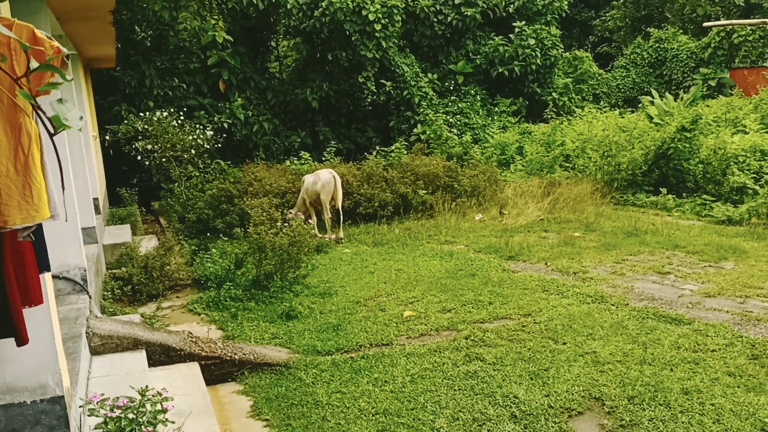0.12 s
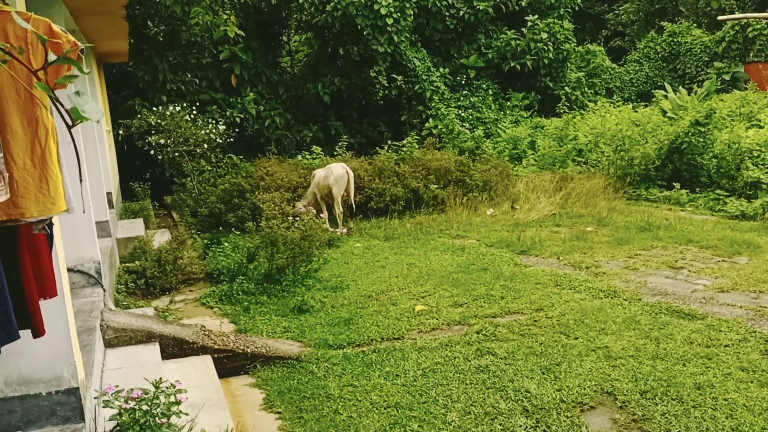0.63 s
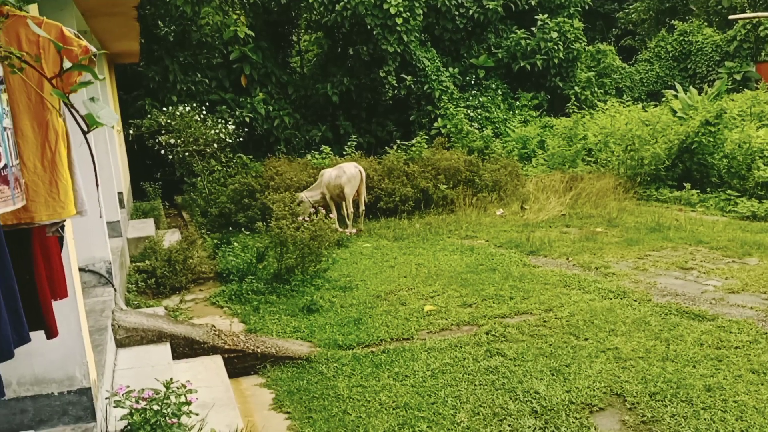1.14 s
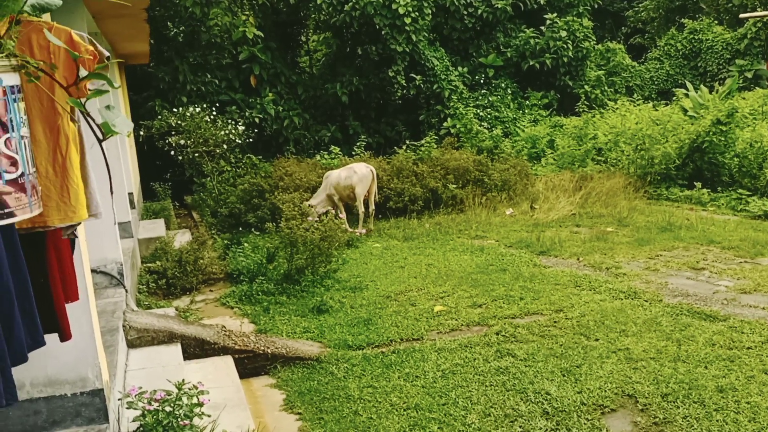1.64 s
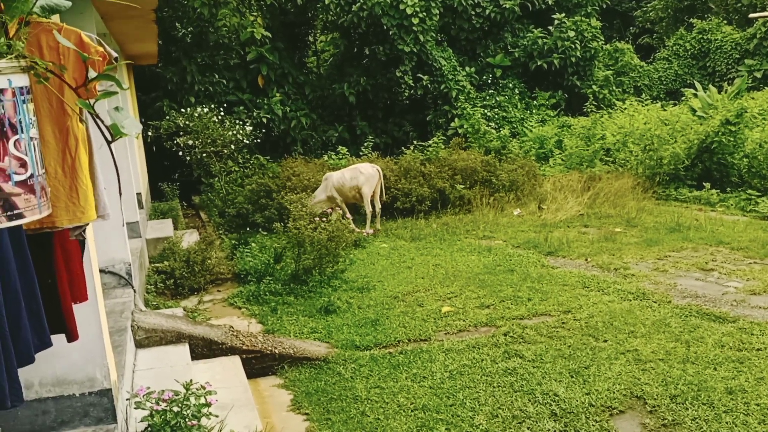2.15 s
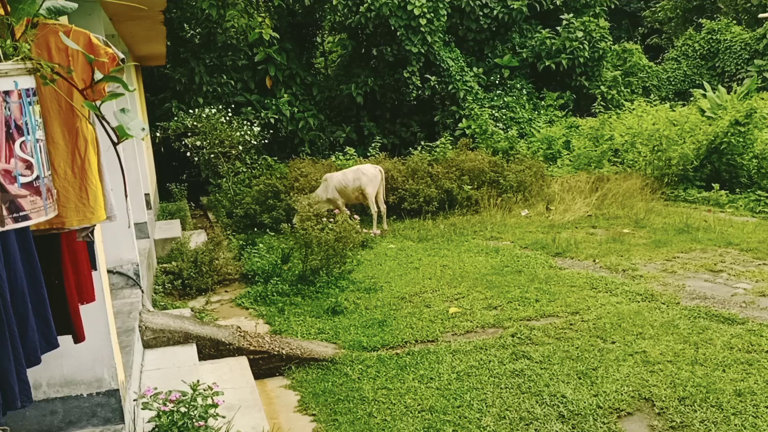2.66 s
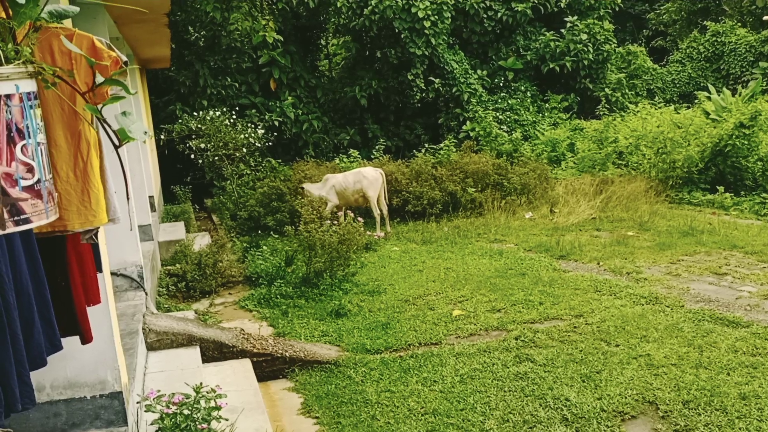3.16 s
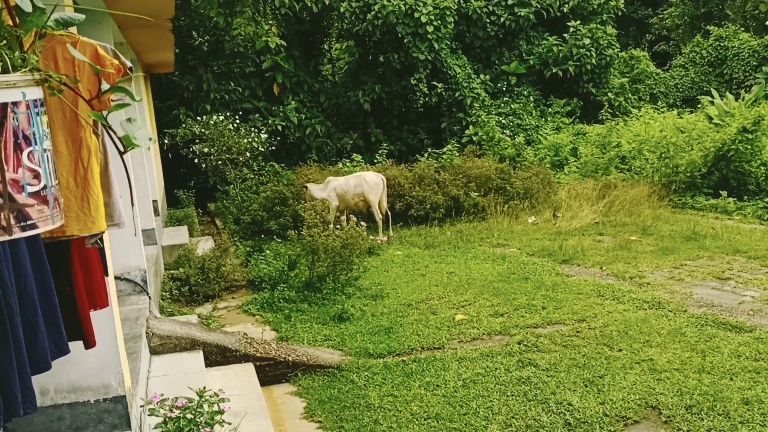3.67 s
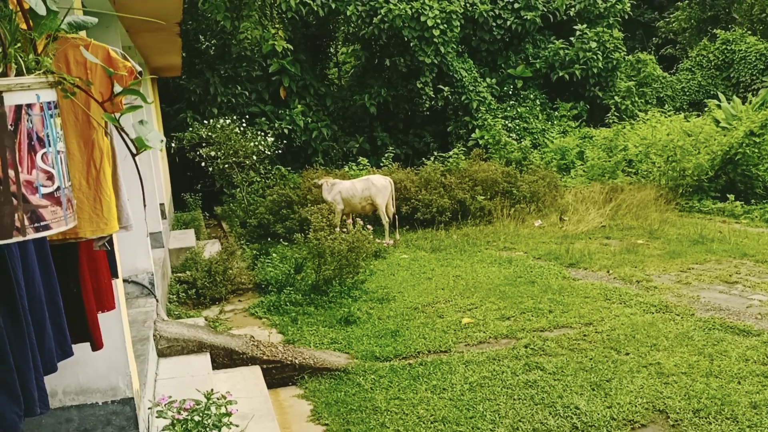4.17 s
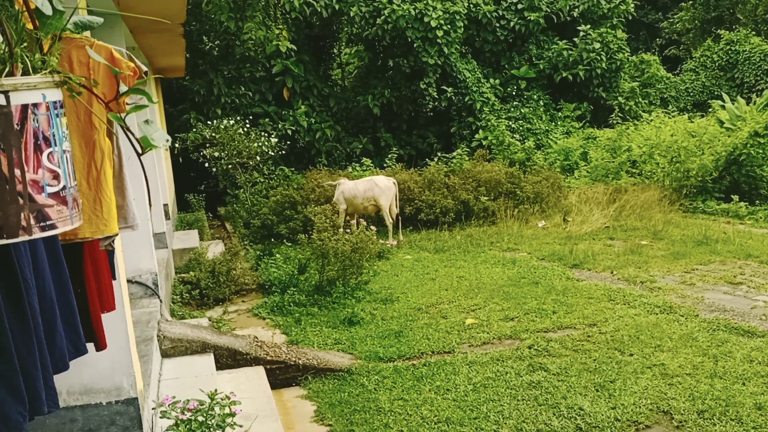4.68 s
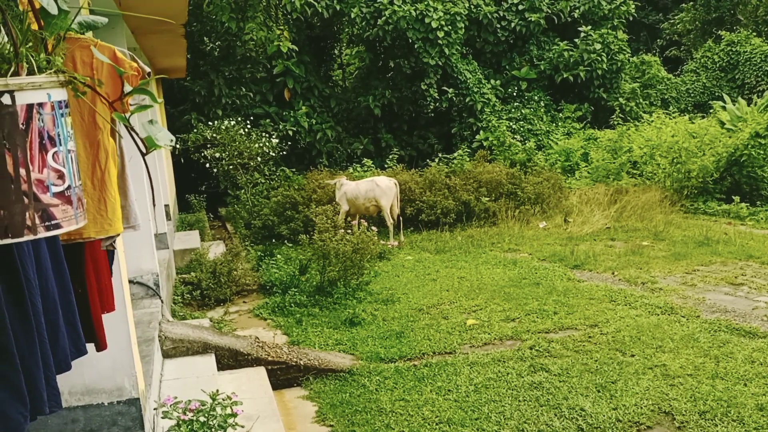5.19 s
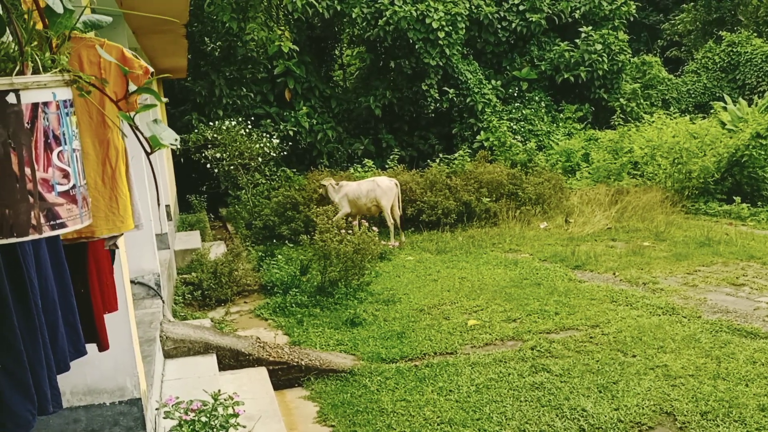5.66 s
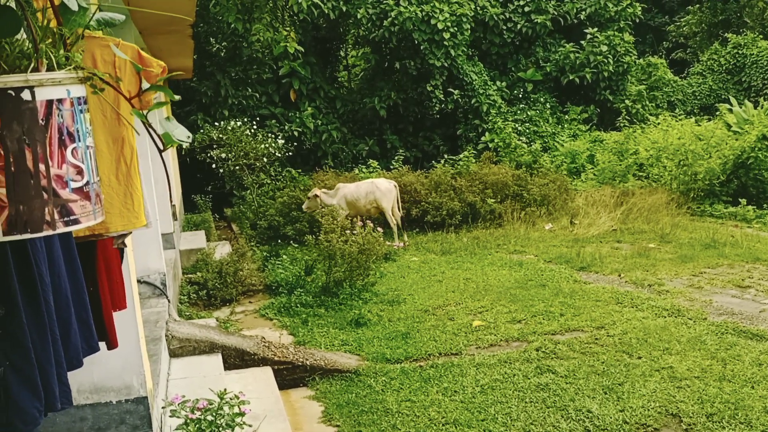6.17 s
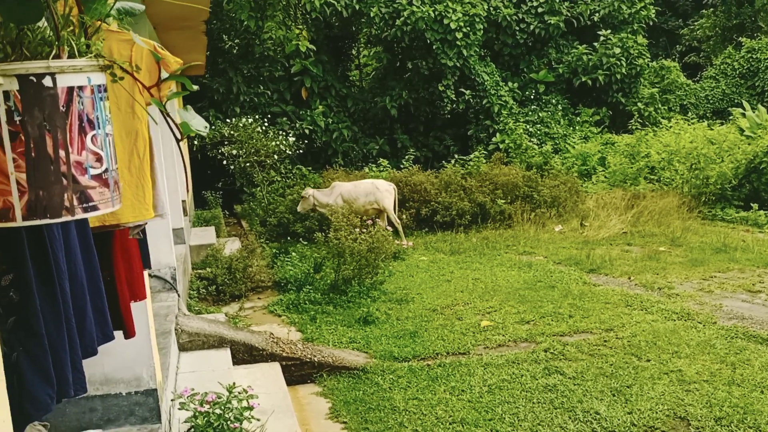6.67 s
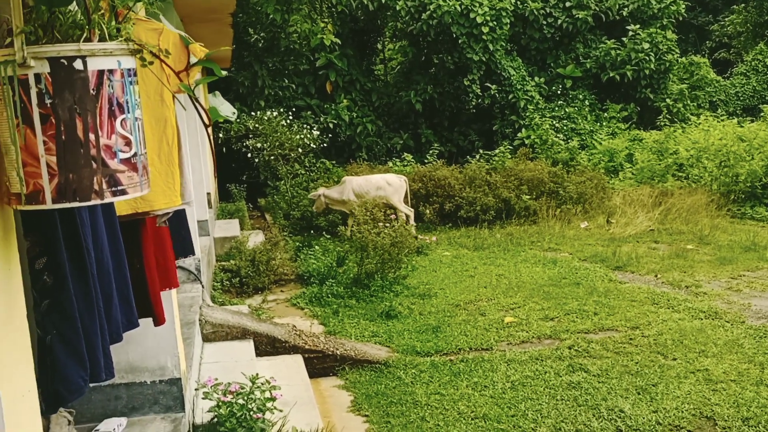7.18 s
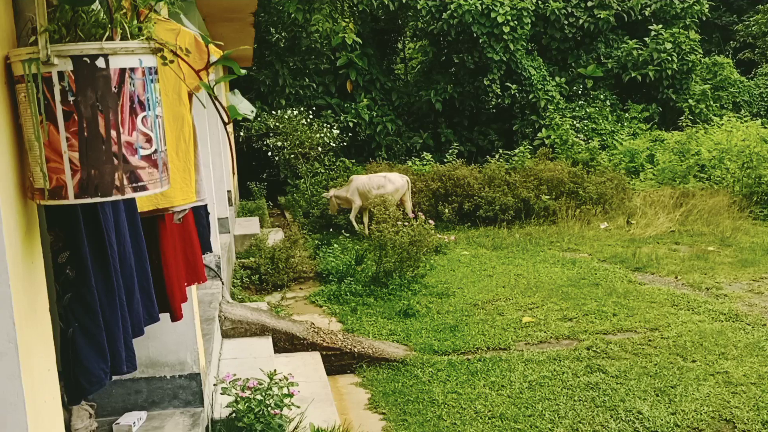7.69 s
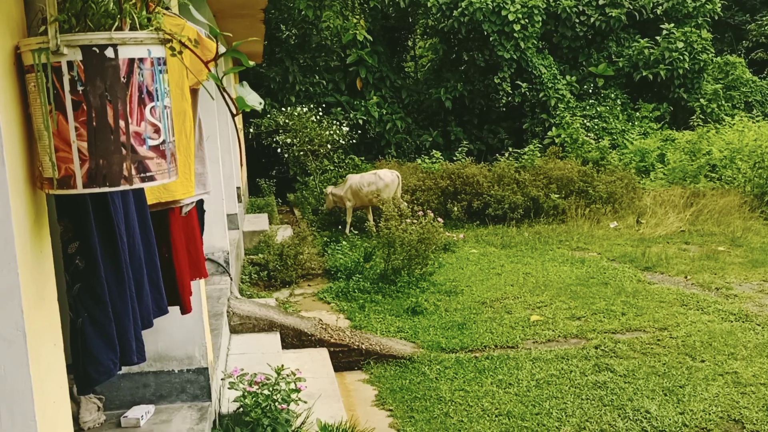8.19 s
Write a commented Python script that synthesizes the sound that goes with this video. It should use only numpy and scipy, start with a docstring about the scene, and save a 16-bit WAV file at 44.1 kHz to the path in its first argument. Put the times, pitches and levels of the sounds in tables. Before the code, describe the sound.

A handheld phone buzzes twice with a rattle close by, then a faint distant cow lows over hissing insects; a bird whistles near the end.

```python
"""On a porch a hand-held phone buzzes twice, close to the microphone: its small unbalanced motor spins up,
knocks and rattles in the case and coasts down. After the second run a cow lows faintly far off, over a faint
distant drone; later chirrs come and go in narrow noise bands, and near the end a bird whistles from the trees.
All along, insects hiss in narrow bands of noise over a soft outdoor floor, with a few dry rustles, hand bumps
and small ticks."""
import sys
import numpy as np
from scipy import signal
from scipy.fft import rfft, irfft
from scipy.io import wavfile
from scipy.ndimage import uniform_filter1d

SR = 44100
rng = np.random.default_rng(int(sys.argv[2]) if len(sys.argv) > 2 else 0)


def undo_db(level):
    """Turn decibels back into plain size, where 20 dB means ten times bigger."""
    steps = np.asarray(level, float) / 20
    return 10 ** steps


def pcm_store(signal):
    """Save signal as 16-bit PCM."""
    levels = np.round(np.clip(np.atleast_2d(signal), -1, 1) * 32767)
    wavfile.write(sys.argv[1], SR, levels.astype(np.int16).T)


N = 367116


def rms_one(x):
    """Scale to unit rms."""
    return x / np.sqrt(np.mean(x ** 2) + 1e-20)


def in_time(rows, t):
    """Read the columns of a curve at times t."""
    s, *columns = np.transpose(rows)
    return [np.interp(t, s, c) for c in columns]


def at_hz(points, hz):
    """Read a spectrum in dB on a log-frequency axis."""
    point_hz, db = np.transpose(points)
    return np.interp(np.log(hz + 1), np.log(point_hz), db)


def colour(x, points):
    """Shape x by a spectrum in dB."""
    gain = undo_db(at_hz(points, np.fft.rfftfreq(len(x), 1 / SR)))
    return irfft(rfft(x) * gain, len(x))


def band(x, low_hz, high_hz):
    """Band-pass."""
    edges_hz = [low_hz, min(high_hz, SR / 2 - 1000)]
    return signal.sosfilt(signal.butter(3, edges_hz, "band", fs=SR, output="sos"), x)


def drift(per_s):
    """Slow chance: straight lines between random knots of unit spread, per_s knots a second."""
    knots = rng.standard_normal(1000)
    return np.interp(np.arange(N) / SR * per_s, np.arange(len(knots)), knots)


def ring(clicks, hz, t60):
    """A two-pole resonator: a unit click sets a decaying sine ringing from height 1."""
    r, w = undo_db(-60 / (t60 * SR)), 2 * np.pi * hz / SR
    return signal.lfilter([0, np.sin(w)], [1, -2 * r * np.cos(w), r * r], clicks + 1e-18)


def burst(t, start, rise, length, low_hz, high_hz, db):
    """A grainy burst of noise that swells and fades in its band."""
    grainy = rng.standard_normal(N) * undo_db(1.8 * drift(70))
    peak_s = start + min(rise, .8 * length)
    swell = np.interp(t, [start, peak_s, start + length], [0, 1, 0]) ** 0.35
    return undo_db(db) * swell * rms_one(band(grainy, low_hz, high_hz))


def phone():
    """Two motor runs, the knocks of the slack rotor as it starts, and small ticks of hand and case."""
    # Each row: current on in seconds, current off in seconds, turns per second once the slack is
    # taken up, top turns per second, spin-up time in seconds.
    runs = [(.361, .701, 18, 258.5, .128), (.952, 1.301, 49, 254.7, .134)]
    # How the hand holds the case, a row for each run: shake in dB at full speed, Hz under which the
    # shake is lost, rattle in dB at full speed, rattle in dB per doubling of speed.
    grips = [(-23.5, 85, -31.5, 7.5), (-19, 114, -28.5, 6)]
    # The loudest knocks. Each row: time in seconds, peak in dB, ring in Hz.
    knocks = [(0.363, -12, 6440), (0.3654, -9, 6650), (0.3763, -8, 6870), (0.3806, -15, 6160),
              (0.3913, -16, 6370), (0.9533, -11, 4350), (0.9553, -11, 5060), (0.9618, -9, 6070),
              (0.9664, -12, 6980), (0.9795, -16, 4500), (1.004, -17, 4390), (1.0161, -17, 6740),
              (1.0241, -16, 5080), (1.0286, -16, 6270)]
    # Ticks of hand and case. Each row: time in seconds, peak in dB, ring in Hz.
    ticks = [(.264, -43, 2600), (.35, -40, 12500), (.3555, -38, 12500), (1.584, -33, 5950),
             (1.615, -29, 5460), (2.64, -48, 3500), (7.125, -36, 6400), (7.308, -43, 1400),
             (7.345, -43, 14000), (7.722, -41, 14000), (7.929, -39, 6500), (7.93, -42, 1600)]
    buzz = sum(map(motor, runs, grips))
    return buzz + taps(knocks + chatter(), 0.0047, bright=0.18) + taps(ticks, 0.0035, bright=0.007)


def motor(run, grip):
    """Off-centre weight shakes the case once a turn; brushes and bearing add locked overtones, grains and hiss."""
    # Colour of the case. Each row: frequency in Hz, level in dB per Hz.
    case = [(470, -16), (800, -6.5), (1930, -3), (2130, -8), (3910, -1), (5970, 0.5), (7010, 3.5),
            (7930, -10.5), (10600, -14), (13500, -1), (15500, -15)]
    # Change of colour with the current off. Each row: frequency in Hz, gain in dB.
    coasting_colour = [(500, -16), (2200, -10), (3200, -2), (15000, 5.5)]
    # Overtones at full speed, relative. Each row: multiple of the turn rate, level in dB.
    overtones = [(2, -47), (4, -38.5), (9, -33.5), (12, -29), (17, -26.5), (24, -29), (27, -30), (31, -29),
                 (35, -35.5), (48, -33), (56, -29), (60, -36)]
    # Multiples that stand out, relative. Each row: multiple of the turn rate, level in dB.
    strong = [(8, -31), (12, -27), (14, -26), (15, -26), (16, -22), (19, -26), (21, -22), (23, -27),
              (28, -28), (30, -25), (38, -33), (40, -30), (45, -34), (50, -34), (53, -32), (55, -29)]
    # Multiples fed by the brushes: each entry is a multiple of the turn rate.
    sparking = (6, 8, 12, 18, 23, 30)
    full_speed_hz, heard_coasting_s = 250, .248
    spark_db = 10  # lift of the brush overtones at standstill, when the current is highest
    on, off, _, top_hz, _ = run
    shake_db, lost_hz, rattle_full_db, rattle_per_doubling_db = grip

    t = np.arange(round(on * SR), round((off + heard_coasting_s) * SR)) / SR
    speed = uniform_filter1d(turning(t, *run), size=250)
    angle = 2 * np.pi * np.cumsum(speed) / SR
    relative = speed / full_speed_hz
    doublings = np.log2(relative)
    left_s = t[-1] - t
    # once the current is off the brushes stop sparking: the overtones blur and the lower rattle dies
    coasting = uniform_filter1d(1. * (t > off), size=300)

    # the shake grows as speed squared
    shake = undo_db(shake_db) * relative ** 2 / np.sqrt(1 + (lost_hz / speed) ** 6)
    edge_s = 0.035
    shake *= np.clip((t - on) / edge_s, 0, 1) * np.clip(left_s / edge_s, 0, 1)
    driven_db = rattle_full_db + rattle_per_doubling_db * doublings
    coasting_db = np.maximum(-33.5 + 15.5 * doublings, -48.5)
    rattle_db = (1 - coasting) * driven_db + coasting * coasting_db

    current = (1 - coasting) * np.sqrt(np.clip(1 - speed / top_hz, 0, 1))
    locked = np.zeros(len(t))
    for k in range(2, 61):
        db = dict(strong).get(k, np.interp(k, *np.transpose(overtones)))
        db = db + spark_db * current * (k in sparking)
        # each overtone slides under the fixed colour of the case and wavers on its own
        db = db + .6 * (at_hz(case, k * speed) - at_hz(case, k * full_speed_hz))
        db = db + 2 * drift(25)[:len(t)]
        blur = .28 * coasting * drift(120)[:len(t)]
        locked += undo_db(db) * np.sin(k * angle + rng.uniform(0, 2 * np.pi) + blur)
    locked /= np.sqrt(uniform_filter1d(locked ** 2, size=1300))

    # loose parts hit more often on one side of each turn, 2500 a second on average at full speed
    chance = 2500 * relative * (1 + 0.61 * np.sin(angle)) / SR
    sizes = undo_db(3.5 * np.minimum(rng.exponential(1, len(t)), 4)) * rng.choice([-1, 1], len(t))
    grains = rms_one((rng.random(len(t)) < chance) * sizes)
    hiss = undo_db(-3) * rng.standard_normal(len(t))
    loose = colour(grains + hiss, case)
    loose /= np.sqrt(uniform_filter1d(loose ** 2, size=1300) + 1e-12)

    # locked over loose part; while driven, slack parts rule at low speed
    share = undo_db(3.5) * np.where(coasting > 0, 1, np.sqrt(relative))
    rattle = (share * locked + loose) / np.sqrt(1 + share ** 2)
    rattle = (1 - coasting) * rattle + coasting * colour(rattle, coasting_colour)
    rattle *= undo_db(rattle_db) * np.clip(0.24 + left_s / 0.093, 0, 1)
    out = np.zeros(N)
    out[round(t[0] * SR):][:len(t)] = shake * np.sqrt(2) * np.sin(angle) + rattle
    return out


def turning(t, on, off, start_hz, top_hz, spin_up_s):
    """Drive against air drag gives a tanh rise; without current the speed decays."""
    coast_s, coast_end_hz = .153, 17.5
    head_start = np.arctanh(start_hz / top_hz)
    driven = top_hz * np.tanh((np.minimum(t, off) - on) / spin_up_s + head_start)
    return driven - (driven - coast_end_hz) * (1 - np.exp(-np.maximum(t - off, 0) / coast_s))


def chatter():
    """Rows of weak knocks, loosely spaced, each on one of two rings of the case."""
    # Weaker knocks between the loud ones. Each row: start in seconds, end in seconds, how many.
    spells = [(.368, .41, 7), (.957, 1.03, 10)]
    rows = []
    for start, end, count in spells:
        for k in range(count):
            s = start + (end - start) * (k + rng.random()) / count
            rows.append((s, -19.5 + rng.normal(), rng.choice((4100, 6400))))  # seconds, peak dB, ring Hz
    return rows


def taps(rows, t60, bright):
    """Each tap is a crack plus a short ring of the case, with a few weaker bounces."""
    out = np.zeros(N)
    for s, db, hz in rows:
        click = np.zeros(400)
        click[0] = 1
        click[rng.integers(8, 60, 3)] = rng.uniform(0.14, 0.15, 3)
        crack = 2.0 * band(click, 0.24 * hz, 1.6 * hz)
        tap = crack + .5 * ring(click, hz, t60) + bright * ring(click, 13100, t60)
        out[round(s * SR):][:len(tap)] += undo_db(db) * tap / np.abs(tap).max()
    return out


def bumps(t):
    """Soft bumps of the hand: fast-rising bursts of low noise."""
    # Each row: start in seconds, length in seconds, level in dB.
    bump_rows = [(-.012, 0.048, -47), (1.224, 0.13, -44.5), (1.33, 0.036, -60), (7.916, 0.14, -58)]
    return sum(burst(t, s, 0.013, length, 68, 407, db) for s, length, db in bump_rows)


def bird(t):
    """Rising whistles, smeared by scattering off the trees and repeated by one strong echo."""
    # One rising whistle. Each row: seconds after its start, pitch in Hz, level in dB over the call.
    whistle = [(0, 3080, -14), (.015, 3162, -9), (.045, 3280, -4), (.065, 3750, 1.5), (0.083, 4500, 0.5),
               (.092, 5050, 2), (.1, 5200, -19)]
    # Each row: start of a call in seconds, its level in dB ahead of the trees.
    calls = [(7.819, -51), (8.154, -48.5)]
    trees_t60_s, build_s, depth_s = .8, .09, .16
    dry = np.zeros(N)
    for start, db in calls:
        hz, shape_db = in_time(whistle, t - start)
        sounding = (t > start) * (t < start + whistle[-1][0])
        tone = np.sin(2 * np.pi * np.cumsum(hz) / SR)
        dry += undo_db(db + shape_db + 4.0 * drift(150)) * tone * sounding
    lag = t[:SR // 2]
    scatter = rng.standard_normal(len(lag)) * (1 - np.exp(-lag / build_s)) * undo_db(-60 * lag / trees_t60_s)
    # echoes arrive in clumps; beyond the near trees less comes back
    scatter *= undo_db(2.5 * drift(120)[:len(lag)]) / (1 + (lag / depth_s) ** 4)
    echoes = undo_db(9) * scatter / np.sqrt(np.sum(scatter ** 2))
    echoes[0] += .4  # the direct path
    echoes[round(.072 * SR)] += undo_db(-7)  # the strong echo
    return signal.fftconvolve(dry, echoes)[:N]


def cow(t):
    """A low moo that sinks in pitch and fades, blurred by distance: each of six overtones wavers in level."""
    # Each row: time in seconds, pitch in Hz, level in dB ahead of the throat.
    moo = [(1.3, 171.3, -53), (1.4, 171, -58.5), (1.6, 170.5, -60), (1.75, 164.2, -58.5), (1.9, 161.4, -66),
           (2.0, 157, -78)]
    # Colour of the throat. Each row: frequency in Hz, gain in dB.
    throat = [(170, -4), (340, 0), (510, -0.5), (680, -18), (850, -12), (1020, -20)]
    pitch, db = in_time(moo, t)
    angle = 2 * np.pi * np.cumsum(pitch) / SR
    voice = np.zeros(N)
    for k in range(1, 7):
        gain = undo_db(at_hz(throat, k * pitch) + 4 * drift(14))
        voice += gain * np.sin(k * angle + 1.2 * drift(30))
    return voice * undo_db(db) * (t > moo[0][0]) * (t < moo[-1][0])


def chirrs(t):
    """Far chirring: noise in a narrow band that swells over a quarter of its length, then fades."""
    # Each row: start in seconds, length in seconds, centre in Hz, level in dB.
    chirr_rows = [(3.12, 0.27, 7070, -63.5), (3.246, 0.33, 7470, -60.5), (3.432, .22, 7180, -54.5),
                  (3.42, 0.35, 6050, -64), (5.822, 0.46, 7050, -63), (6.145, 0.28, 6800, -64.5),
                  (6.33, 0.26, 7260, -65.5), (6.297, 0.32, 3820, -62), (6.48, 0.11, 6400, -63),
                  (6.949, 0.46, 3730, -66), (8.292, .07, 7370, -53)]
    half_hz = 770 / 2
    return sum(burst(t, s, 0.24 * length, length, hz - half_hz, hz + half_hz, db)
               for s, length, hz, db in chirr_rows)


def rustles(t):
    """Dry rustles: fast-rising bursts of noise, each in its own band."""
    # Each row: start in seconds, length in seconds, low edge in Hz, high edge in Hz, level in dB.
    rustle_rows = [(-.03, 0.085, 860, 1910, -51.5), (.29, .17, 3020, 5000, -62.5),
                   (2.3, 0.043, 3500, 5170, -62), (3.295, 0.062, 1000, 5000, -61.5),
                   (3.633, 0.52, 2540, 3360, -67.5), (3.68, 0.21, 4800, 7800, -62),
                   (4.283, 0.48, 2880, 6040, -66), (4.39, 0.31, 2940, 7550, -67),
                   (5.276, 0.44, 2800, 4650, -63.5), (6.354, 0.11, 1160, 3570, -57.5),
                   (6.466, 0.15, 2190, 3550, -59.5), (6.84, 0.14, 3600, 4815, -68)]
    return sum(burst(t, s, 0.039, *row) for s, *row in rustle_rows)


def drone(t):
    """A faint low band of noise swells and fades far off."""
    # One row: start, rise and length in seconds, low edge and high edge in Hz, level in dB.
    far_drone = (1.35, 0.1, 3, 362, 563, -70)
    return burst(t, *far_drone)


def outdoors(t):
    """Coloured noise floor and insect bands of noise, some steady, some pulsing, rising and sinking together."""
    # Colour of the floor. Each row: frequency in Hz, level in dB per Hz.
    floor_colour = [(24, -38), (40, -12), (91, -1.5), (170, -5), (300, -2.5), (430, -7.5), (653, -10.5),
                    (860, -8), (2160, -14.5), (4800, -14), (6640, -18.5), (8520, -19), (11800, -15),
                    (12700, -34), (15500, -19)]
    # How the floor swells and sinks. Each row: time in seconds, level in dB.
    air = [(0, -52), (.05, -52.5), (.13, -60.5), (1.2, -49.5), (1.6, -54), (1.85, -56.5), (2.3, -59.5),
           (3.3, -60), (4.1, -61.5), (5.3, -60), (7.8, -60), (7.92, -56.5), (8.08, -51.5), (8.14, -58),
           (8.3, -51)]
    # Insect choruses. Each row: centre in Hz, width in Hz, level in dB over the floor level,
    # pulses per second, pulse depth from 0 (steady) to 1.
    insects = [(5657, 570, -9.5, 110, 0.36), (9480, 690, -8.5, 120, 0), (10070, 540, -7.5, 120, 0.16),
               (11170, 580, -17.5, 99, 0)]
    # A high throbbing insect. One row: low edge in Hz, high edge in Hz, dB over the floor level
    # at the start of a throb, fade time in seconds.
    throbbing = (12800, 15500, -12, .04)
    throbs_per_s, first_throb_s = 4.5, .015

    air_db, = in_time(air, t)
    floor = rms_one(colour(rng.standard_normal(N), floor_colour))
    bass = band(floor, 44, 1160)
    out = floor + bass * (undo_db(3 + 1.0 * drift(10.0)) - 1)  # the bass is lifted and wavers
    for hz, width, db, per_s, depth in insects:
        pulses = 1 + depth * np.sin(2 * np.pi * per_s * t + 0.84 * drift(7.2))
        hiss = rms_one(band(rng.standard_normal(N), hz - width / 2, hz + width / 2))
        out += undo_db(db + 1.6 * drift(4) + 1.6 * drift(14)) * pulses * hiss
    low_hz, high_hz, db, fade_s = throbbing
    since = (t - first_throb_s) % (1 / throbs_per_s)
    throb = uniform_filter1d(np.exp(-since / fade_s), size=600)
    high_hiss = rms_one(band(rng.standard_normal(N), low_hz, high_hz))
    out += undo_db(db + 3.0 * drift(4.5)) * throb * high_hiss
    return undo_db(air_db) * out


def scene():
    """One microphone feeds both channels."""
    t = np.arange(N) / SR
    near = phone() + bumps(t)
    far = bird(t) + cow(t) + chirrs(t) + rustles(t) + drone(t)
    return np.tile(near + far + outdoors(t), (2, 1))


def band_limit(x):
    """A steep low-pass at the top of the band."""
    return signal.sosfilt(signal.butter(12, 16500, fs=SR, output="sos"), x)


def record(dry):
    """The microphone drops the deep bass under 40 Hz; the top is cut steeply, 50 dB down from 15850 Hz."""
    dry = signal.sosfilt(signal.butter(2, 40, "high", fs=SR, output="sos"), dry)
    dry = signal.sosfilt(signal.cheby2(14, 50, 15850, fs=SR, output="sos"), dry)
    return band_limit(dry)


dry = scene()
out = record(dry)
pcm_store(out)
```